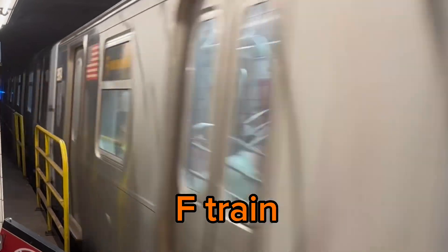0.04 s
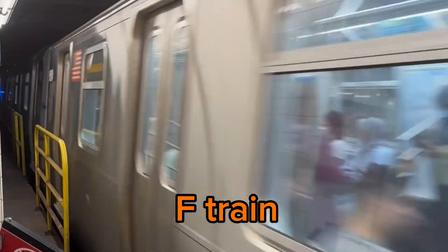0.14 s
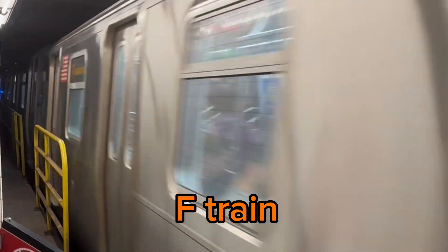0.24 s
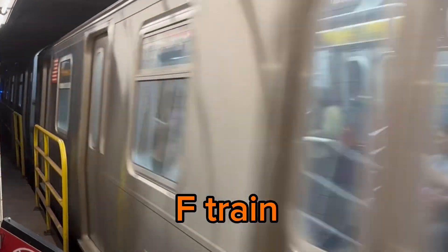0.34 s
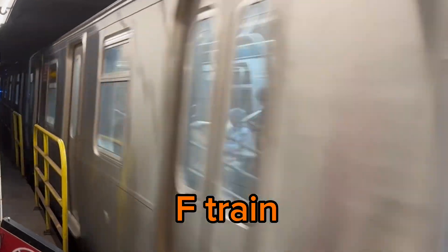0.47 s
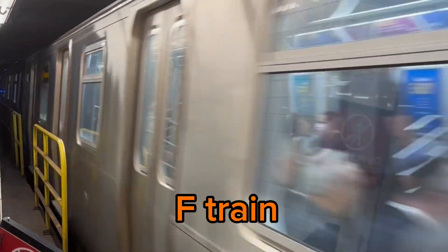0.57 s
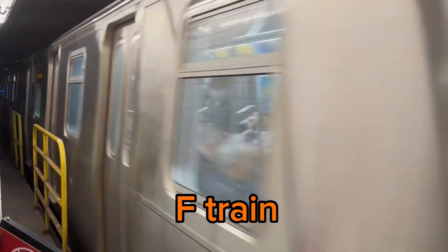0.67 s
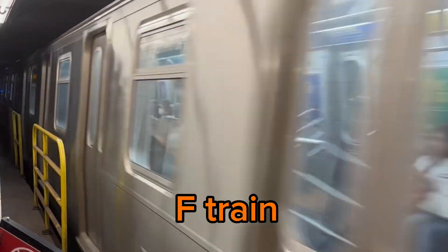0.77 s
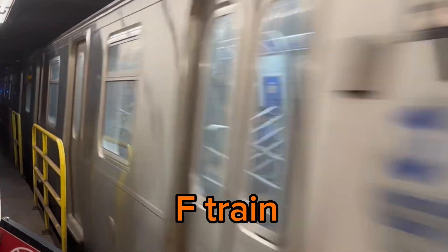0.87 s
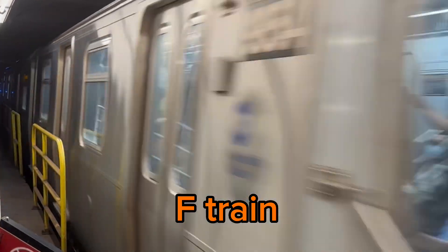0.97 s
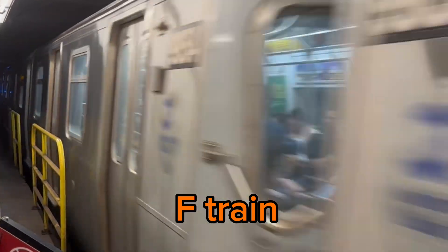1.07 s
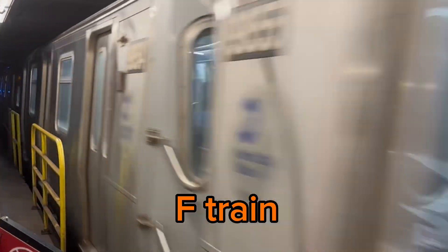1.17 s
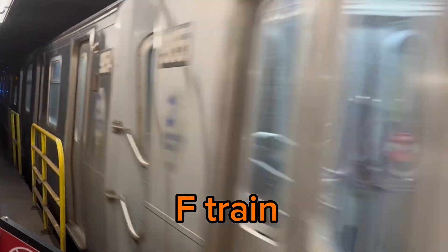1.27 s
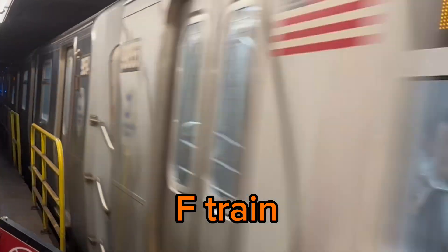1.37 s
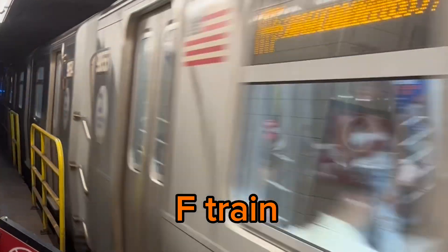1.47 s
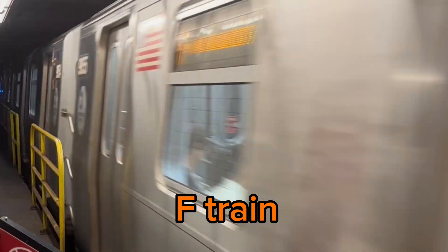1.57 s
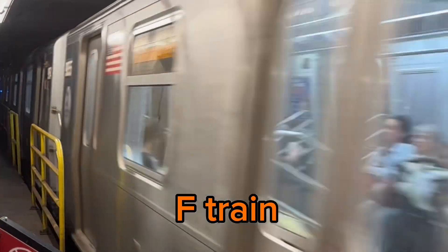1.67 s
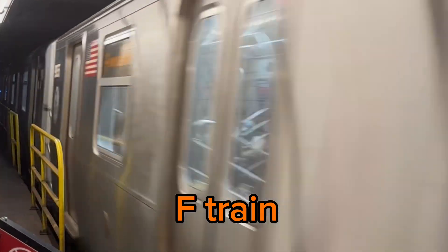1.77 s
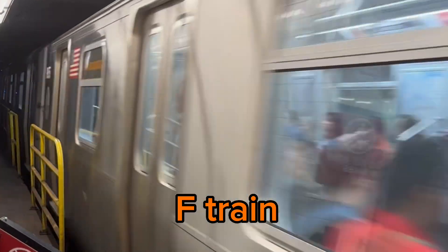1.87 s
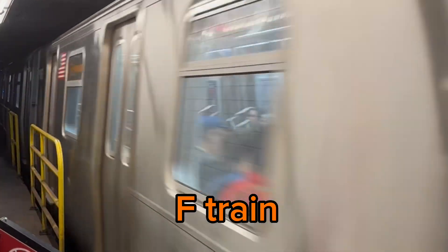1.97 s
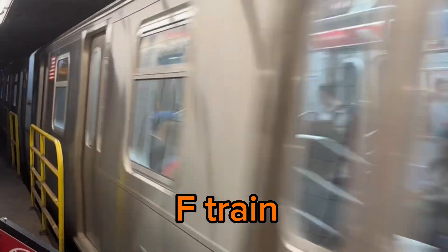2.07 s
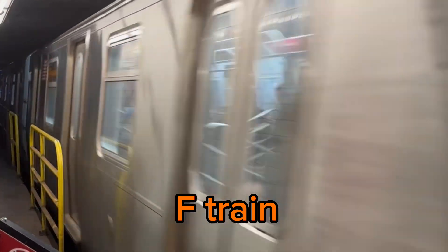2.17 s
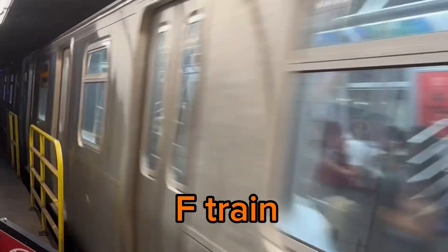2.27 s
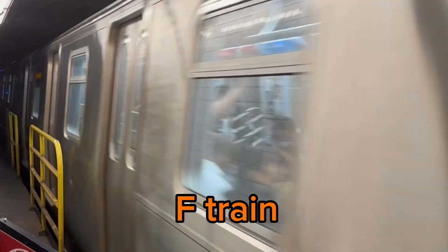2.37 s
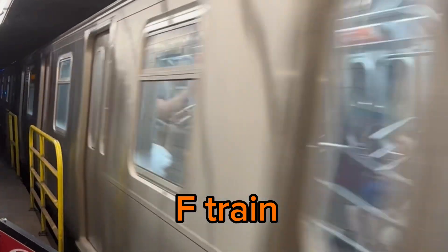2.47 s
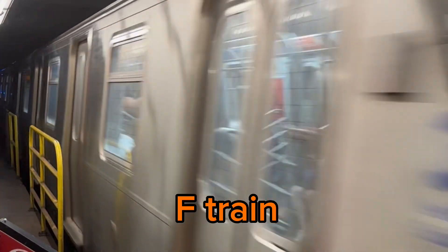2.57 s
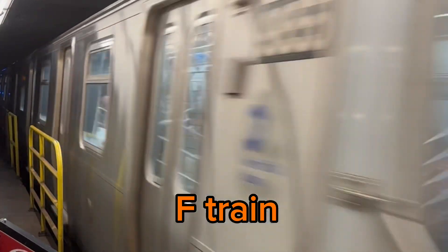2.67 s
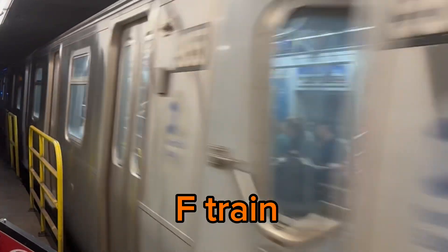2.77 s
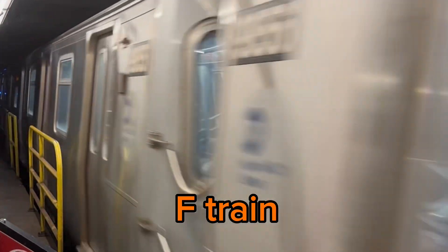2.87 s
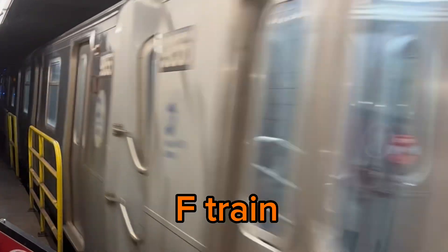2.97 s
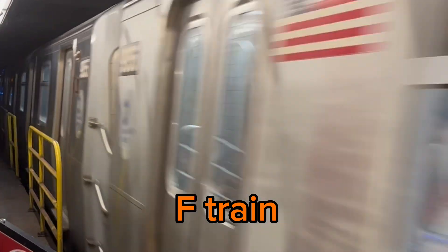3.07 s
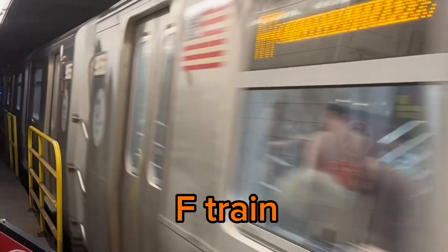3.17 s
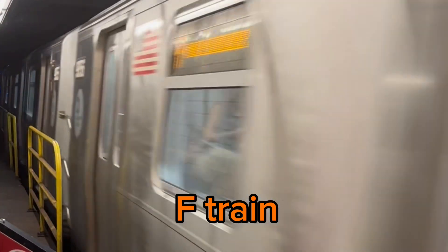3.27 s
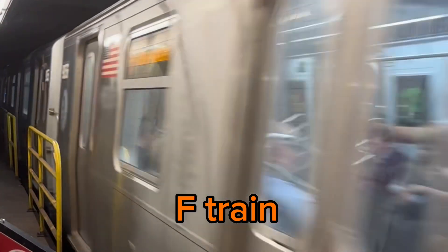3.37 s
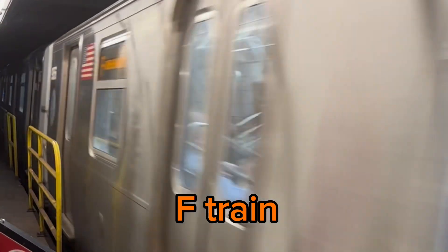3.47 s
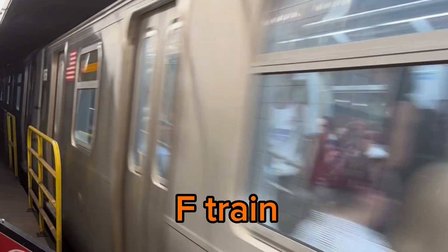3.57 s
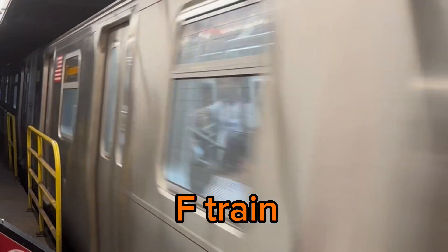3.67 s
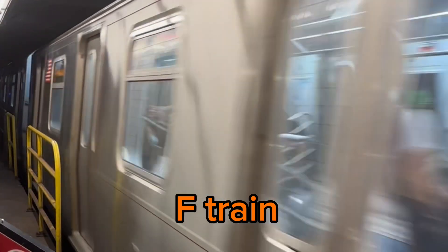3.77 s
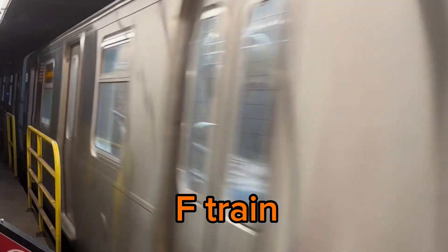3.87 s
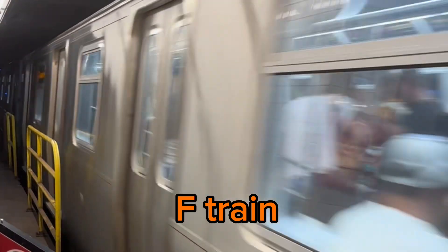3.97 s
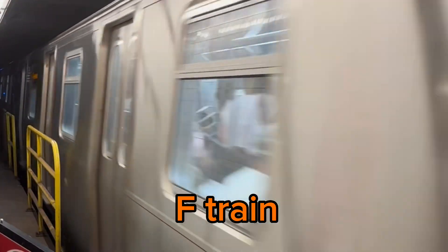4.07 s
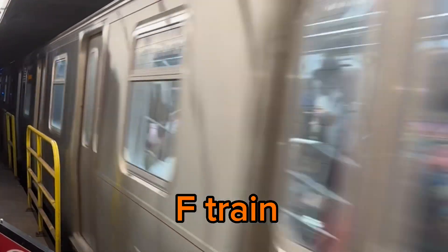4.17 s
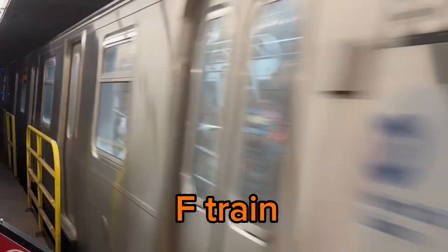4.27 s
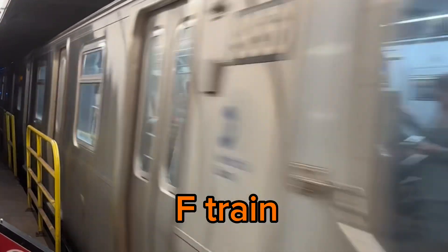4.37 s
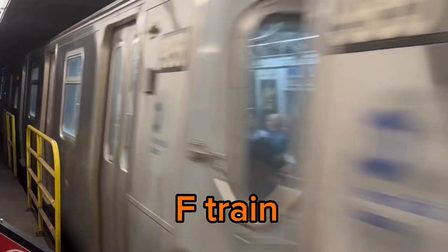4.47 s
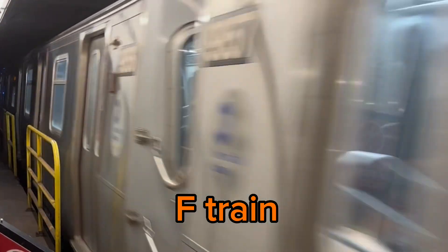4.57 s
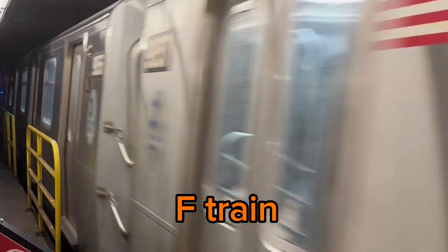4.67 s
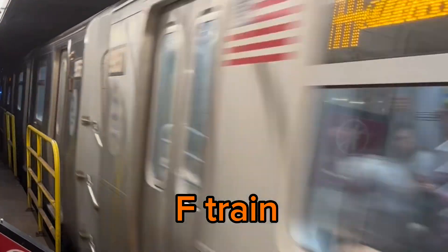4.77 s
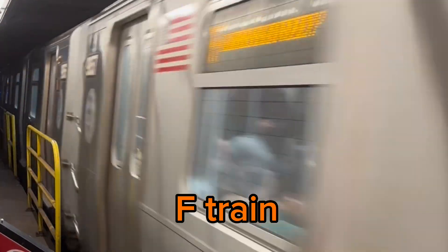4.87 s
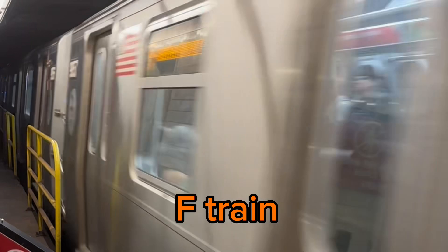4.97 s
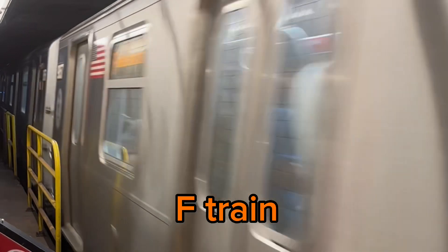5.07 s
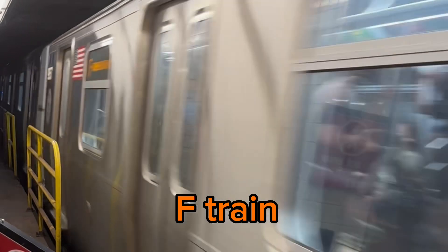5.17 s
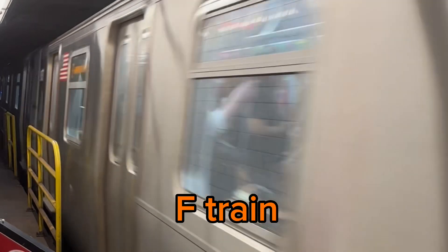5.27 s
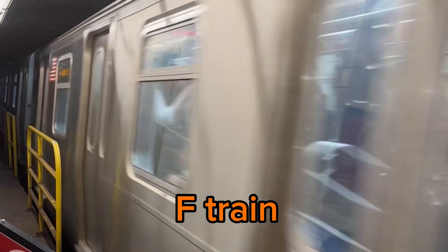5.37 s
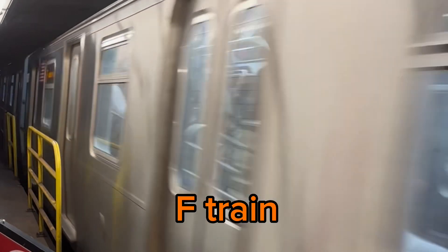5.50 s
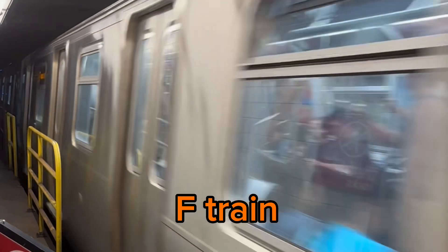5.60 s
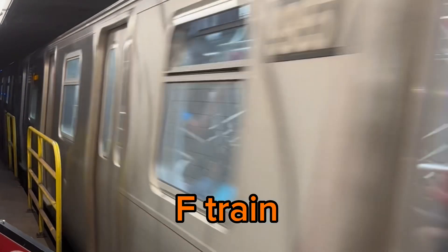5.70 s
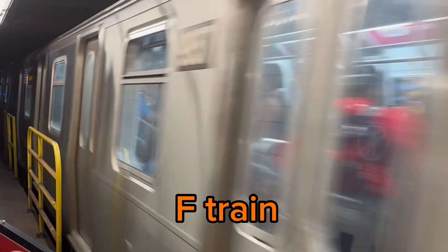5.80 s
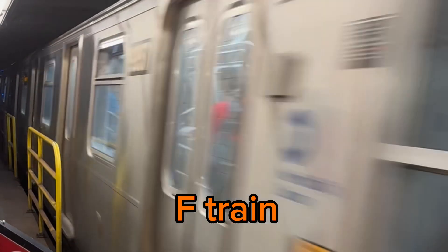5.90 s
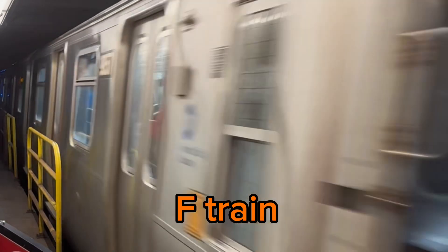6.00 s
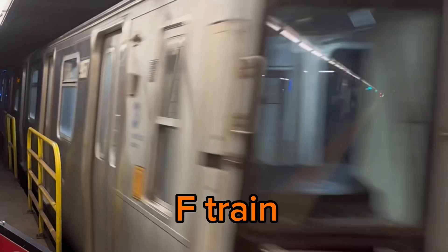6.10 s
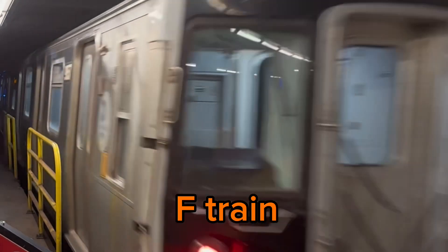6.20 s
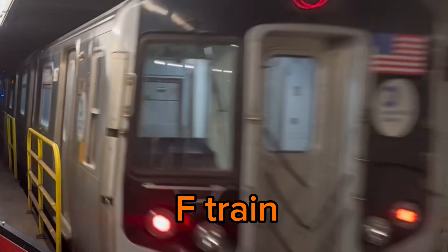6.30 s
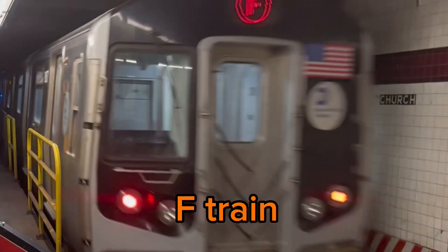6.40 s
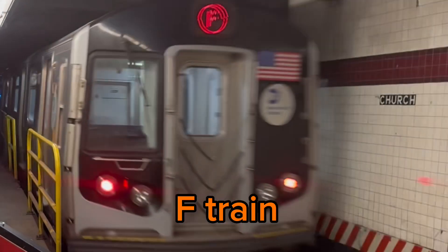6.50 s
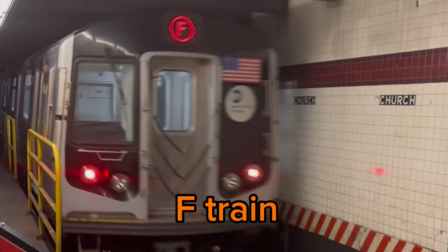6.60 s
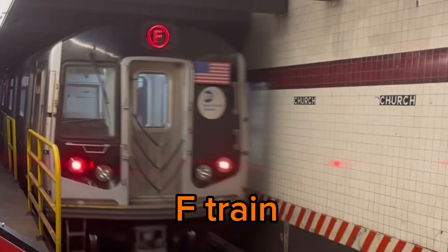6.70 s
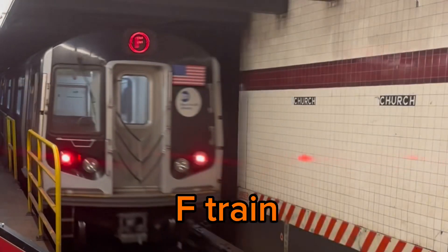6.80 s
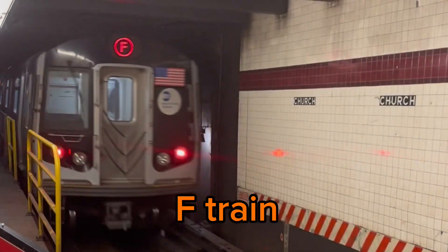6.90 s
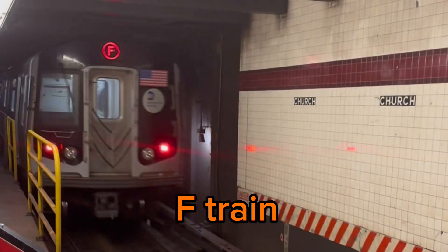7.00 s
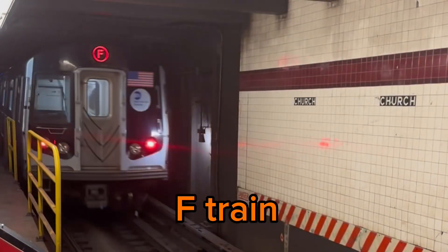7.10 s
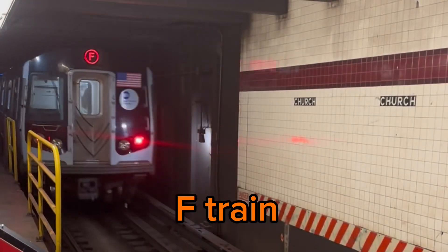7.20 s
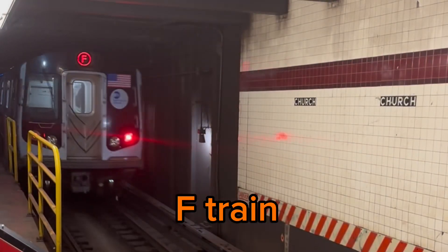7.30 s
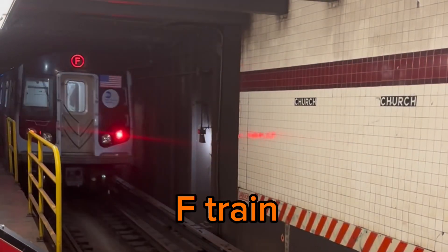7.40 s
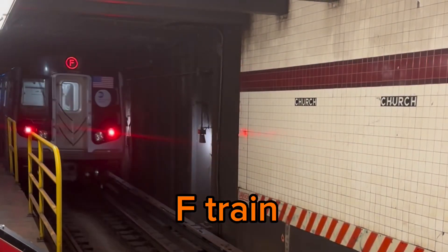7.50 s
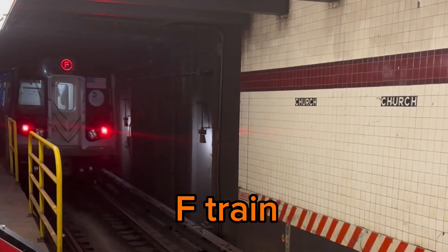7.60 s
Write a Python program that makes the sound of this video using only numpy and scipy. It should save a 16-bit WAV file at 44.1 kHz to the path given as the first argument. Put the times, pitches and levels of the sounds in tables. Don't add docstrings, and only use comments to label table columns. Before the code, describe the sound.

Close rumbling subway cars roll by with humming motors, singing rails and echoing joint clacks, fading as the last car leaves.

```python
import sys
import numpy as np
from scipy import signal
from scipy.fft import rfft, irfft, next_fast_len
from scipy.io import wavfile
from scipy.ndimage import uniform_filter1d

SR = 44100
rng = np.random.default_rng(int(sys.argv[2]) if len(sys.argv) > 2 else 0)


def how_loud(loudness_db):
    steps = np.asarray(loudness_db, float) / 20
    return 10 ** steps


def waveform_to_disk(signal):
    frames = np.transpose(np.atleast_2d(signal))
    scaled = np.clip(frames, -1, 1) * 32767
    samples = np.round(scaled).astype(np.int16)
    wavfile.write(sys.argv[1], SR, samples)


N = 337364
SIZE = next_fast_len(N + SR)
HZ = np.maximum(np.arange(SIZE // 2 + 1) * SR / SIZE, 1)
TIME = np.arange(N) / SR


def on_hz(table, hz=HZ, axis=1):
    table = np.array(table, float)
    return np.interp(np.log(hz), np.log(table[:, 0]), table[:, axis])


def on_time(table):
    s, *columns = np.transpose(table)
    return np.array([np.interp(TIME, s, c) for c in columns])


def shape(x, gain):
    return irfft(rfft(x, SIZE) * gain, SIZE)[..., :N]


def unit(x):
    return x / np.sqrt(np.mean(x ** 2))


def walk(rate):
    k = int(SR / rate)
    steps = np.repeat(rng.standard_normal(N // k + 1), k)
    return 1.296 * uniform_filter1d(uniform_filter1d(steps, k), k)[:N]


def bands(grid=HZ):
    for hz in 22 * 2 ** (np.arange(20) / 2):
        yield hz, np.cos(np.pi / 2 * np.clip(2 * np.log2(grid / hz), -1, 1))


def bell(hz, width):
    return 1 / (1 + (2 * (HZ - hz) / width) ** 2)


# (pitch [Hz], width [Hz], boost [dB])
STEEL = [(60.4, 5.7, 9.5), (331, 15.6, 3), (474, 173, 5.5), (698, 38, 3.5), (870, 74, -0.5), (1940, 205, 5),
         (2730, 210, -6.5), (4120, 820, 6), (6000, 720, 3.5)]


def steel():
    return how_loud(sum(db * bell(hz, width) for hz, width, db in STEEL))


# (time [s], nearness [dB], rail roughness [dB])
ROLL = [(0.0, 1.5, 1.5), (.34, -1.5, -2.5), (.59, -1.5, -2.5), (.79, -0.5, 1), (1.3, 1, -2), (1.83, 1, -1),
        (2.2, 0.5, 0), (2.98, 2, 1.5), (3.56, 1.5, -1), (3.85, 0, -0.5), (4.25, 1.5, 2.5), (4.71, 1.5, 2),
        (5.2, 0, 0.5), (5.45, -.5, -1), (5.94, -2.5, 5), (6.4, 3.5, -3), (6.88, -3, 1), (7.65, -4.5, -2)]
ZONE_HZ = (90, 500, 2600, 8000, 15000)
NEAR_SHARE = (0.53, 1.06, 0.68, 1.1, 1.1)
ROUGH_SHARE = (0.16, .05, 0.83, 1.1, 1.2)
# (frequency [Hz], level [dB per Hz])
BODY = [(25, -76), (40, -64.5), (60, -57), (150, -54), (340, -50.5), (560, -57), (900, -58.5), (1350, -66),
        (2600, -76), (3600, -80.5), (5200, -83.5), (8000, -84), (11000, -89), (15500, -95)]


def rolling(flicker_db=.8, shared_db=.3):
    colour = how_loud(on_hz(BODY)) * steel() * np.sqrt(SR / 2)
    rough = rfft(rng.standard_normal((2, SIZE))) * colour
    near_db, rough_db = on_time(ROLL)
    swell = np.outer(NEAR_SHARE, near_db) + np.outer(ROUGH_SHARE, rough_db)
    swell[0] += 0.1 * (TIME - TIME.mean())
    top_fade_start_s, top_fade_s, top_fade_db = 5.72, .1, -8
    swell[-1] += top_fade_db * np.clip((TIME - top_fade_start_s) / top_fade_s, 0, 1)
    out, shared = 0, walk(8.2)
    for hz, window in bands():
        place = np.interp(np.log(hz), np.log(ZONE_HZ), np.arange(5))
        db = np.maximum(1 - np.abs(place - np.arange(5)), 0) @ swell
        flicker = how_loud(db + shared_db * shared + flicker_db * walk(14))
        out = out + flicker * irfft(rough * window, SIZE)[:, :N]
    return out


# (time [s], centre [Hz], strength [dB])
SING = [(.35, 2650, 5), (.8, 3100, 4), (1.3, 2730, 2), (2.5, 2800, 3.5), (3.3, 2792, 1.5), (4.4, 2800, 4),
        (6.25, 2607, 1.5), (6.9, 3147, 2.5), (7.65, 2880, -1)]


def singing(width_hz=800):
    hz, strength_db = on_time(SING)
    near_db, rough_db = on_time(ROLL)
    db = -48 + strength_db + 0.94 * near_db + 0.26 * rough_db
    rub = unit(shape(rng.standard_normal((4, N)), bell(0, width_hz)))
    spin = np.exp(2j * np.pi * np.cumsum(hz) / SR)
    return how_loud(db) * np.real((rub[:2] + 1j * rub[2:]) * spin)


# (frequency [Hz], time to fall 60 dB [s])
HALL = [(100, 0.37), (500, 1), (1500, 1), (4000, 0.84), (12000, 0.46)]


def hall(rise_s, early=0.35, early_s=0.054, early_hz=1500):
    t = np.arange(SR) / SR
    noise = rfft(rng.standard_normal((2, SR)))
    tail = 0
    for hz, window in bands(np.maximum(np.arange(SR // 2 + 1), 1)):
        pit = 1 + early / (1 + (hz / early_hz) ** 4) * np.exp(-t / early_s)
        fall = how_loud(-60 * t / on_hz(HALL, hz))
        tail = tail + irfft(noise * window, SR) * fall * pit
    tail = tail * (1 - np.exp(-t / rise_s))
    return rfft(tail / np.sqrt(np.sum(tail ** 2) / 2), SIZE)


# (time [s], blow [dB], thud over blow [dB], crack over blow [dB])
JOINTS = [(0.0936, -20.5, 7, -16.5), (1.1892, -19.5, 2.5, -18), (1.3044, -36.5, 11.5, -15.5),
          (1.3849, -21.5, 4.5, -13.5), (1.6436, -18.5, 2, -14.5), (1.8257, -21, 9, -15.5),
          (2.6353, -25, 2, -20.5), (2.8967, -19, -0.5, -14.5), (3.0858, -19, 3.5, -16.5),
          (3.3105, -23.5, 4, -16.5), (3.344, -18.5, -1, -15), (3.5204, -17.5, 5, -15),
          (4.3394, -26.5, -10, -26.5), (4.5712, -20, 3, -13.5), (4.7617, -19.5, 3, -17),
          (5.0017, -19, 1.5, -15.5), (5.1877, -17.5, 4, -14.5), (6.1564, -20, 1, -30),
          (6.2174, -17.5, 0, -12.5), (6.4047, -14, 3.5, -12), (7.0317, -33.5, 10.5, -11),
          (7.2195, -25, 3, -21), (7.5495, -29.5, 3.5, -14)]
# (frequency [Hz], level [dB])
CLACK = [(900, -6), (1500, -1.5), (2800, -8.5), (4500, -16), (5300, -29), (8000, -26.5), (15500, -36)]
# (frequency [Hz], level [dB])
THUD = [(60, -20.5), (200, -8), (400, -3.5), (650, -5), (1050, -1), (1350, -17.5), (2500, -39)]
# (frequency [Hz], level [dB])
CRACK = [(3000, -12), (5300, 2.5), (6500, 1), (9500, -2), (15500, -16.5)]


def joints(thud_lead_s=0.00294, rattle_s=.012, patterns=5):
    blows = np.zeros((patterns, 3, N))
    leads_s = (0, thud_lead_s, 0)
    drags = (2.2, .8, 2.2)
    firsts = (.95, 3.2, .8)
    for k, (s, blow_db, thud_db, crack_db) in enumerate(JOINTS):
        layers_db = (blow_db, blow_db + thud_db, blow_db + crack_db)
        chance = rng.random((2, 30))
        late = 3 * chance[0] * (np.arange(30) > 0)
        push = 2 * chance[1] - 1
        clatter = push * np.abs(push) * np.exp(-late)
        for blow, db, lead_s, drag, first in zip(blows[k % patterns], layers_db, leads_s, drags, firsts):
            knock_s = s - lead_s + drag * rattle_s * late
            at = np.minimum((knock_s * SR).astype(int), N - 1)
            np.add.at(blow, at, how_loud(db) * unit(np.where(late > 0, clatter, first)))
    colours_db = np.array([on_hz(CLACK) + 22, on_hz(THUD) + 29, on_hz(CRACK) + 20])
    colours = how_loud(colours_db) * steel()
    direct, echo_rise_s = .2, .0015
    heard = 0
    for group in blows:
        bang = np.sum(rfft(group, SIZE) * colours, axis=0)
        heard = heard + bang * (direct + hall(echo_rise_s))
    return irfft(heard, SIZE)[:, :N]


HUM_HZ = (113.2, 232.9, 327.4)
HUM_FAR_DB, HUM_WAVER = (-43.5, -45, -43), (0.0162, 0.01202, 0.02214)
# (middle [s], length [s], level [dB])
DRIVES = [
    [(.2, 0.27, -35.5), (.62, 0.21, -34.5), (1.23, 0.14, -35), (1.45, .14, -29.5), (1.67, 0.088, -32),
     (2.0, 0.11, -31), (2.45, 0.7, -37.5), (3.1, 0.65, -33), (3.8, 0.49, -29), (4.45, 0.59, -26),
     (4.95, 0.25, -27), (5.75, .8, -37.5), (6.5, .12, -31.5)],
    [(.2, 0.27, -39.5), (1.2, 0.2, -45), (1.45, 0.074, -28), (2.15, 0.48, -35), (3.75, 0.77, -27.5),
     (4.35, 0.29, -33), (4.73, 0.21, -31), (5.38, 0.88, -31.5), (6.2, 1, -35.5), (7.22, 0.22, -34.5)],
    [(1.23, 0.15, -36), (1.65, 0.39, -32), (2.73, 0.35, -32.5), (3.36, 0.29, -29), (3.95, 0.54, -30),
     (4.65, .6, -31.5), (6.35, .25, -27.5), (7.1, 0.47, -41)],
]


def motors():
    out = 0
    for hz, far_db, waver, passes in zip(HUM_HZ, HUM_FAR_DB, HUM_WAVER, DRIVES):
        near = how_loud(far_db)
        for s, length_s, db in passes:
            near = near + how_loud(db) * np.exp(-(2 * (TIME - s) / length_s) ** 4)
        loudness = near * how_loud(2.4 * walk(13))
        pitch = hz * (1 + waver * walk(5))
        out = out + loudness * np.sin(2 * np.pi * np.cumsum(pitch) / SR)
    return np.sqrt(2) * out


# (time [s], pitch [Hz], level [dB], held [s])
SQUEALS = [
    (1.30, 6000, -48, .03),
    (1.348, 6000, -34, .002),
    (1.40, 6000, -47, .09),
    (3.0, 5950, -48, .02),
    (3.03, 5990, -36.5, .12),
]


def flanges(octave_db=-24, attack_s=.014, t60_s=0.42):
    slip = shape(rng.standard_normal((2, N)), bell(0, 260))
    flutter = how_loud(1.2 * walk(29.88))
    slip = (unit(slip[0]) + 1j * unit(slip[1])) * flutter
    wander = np.cumsum(20 * walk(15)) / SR
    out = 0
    for s, hz, db, held_s in SQUEALS:
        spin = np.exp(2j * np.pi * (hz * TIME + wander))
        rise = np.clip((TIME - s) / attack_s, 0, 1)
        fall_db = -60 * np.maximum(TIME - s - attack_s - held_s, 0) / t60_s
        out = out + rise * how_loud(db + fall_db) * np.real(slip * (spin + how_loud(octave_db) * spin ** 2))
    return out


# (time [s], level [dB], time to fall 60 dB [s])
PUFFS = [
    (.56, -28, 1),
]


def valve(rise_s=0.058):
    hiss_db = on_hz([(2500, -6.5), (6000, -6), (9000, -3), (16000, -4)])
    jet = unit(shape(rng.standard_normal((2, N)), how_loud(hiss_db)))
    pressure = 0
    for s, db, t60_s in PUFFS:
        age = np.maximum(TIME - s, 0)
        pressure = pressure + how_loud(db - 60 * age / t60_s) * (1 - np.exp(-age / rise_s))
    return jet * pressure


def scene():
    tones = motors() + flanges()
    both_tones = np.array([tones, np.roll(tones, SR // 90)])
    return rolling() + singing() + joints() + both_tones + valve()


def top_cut(x):
    return signal.sosfilt(signal.butter(12, 17070, fs=SR, output="sos"), x)


# (frequency
# [Hz], sum [dB], difference [dB], in-phase share [0-1], quarter-turn share [signed ratio])
SIDES = [(40, 7.5, -44, 0.065, 0), (120, -0.5, -41, .1, -1.75), (300, -1, -20, .5, 0.54),
         (586, -2, -9.5, 0.38, 0.1), (805, 0, -4, 0.12, -0.31), (1140, -2, -9, 0, .45),
         (1900, -1, -21, .1, .1), (2880, 1, -0.5, 0.032, .2), (4100, -4, -11.5, 0, .2),
         (6000, -1.5, -6.5, 0.028, -.75), (8220, -1.5, -1.5, 0.000054, -.75), (10240, -10, -3, 0.13, -.4),
         (10700, -24.5, -3.5, 0.13, 0), (13240, -14.5, -5, 0, 0), (15500, -6, -3.5, 0.084, .3)]


def record(dry):
    total_db, apart_db, in_phase, quadrature = (on_hz(SIDES, axis=k) for k in range(1, 5))
    apart_db = np.maximum(apart_db, -22)
    tied = in_phase + 1j * quadrature
    free = np.sqrt(np.clip(1 - np.abs(tied) ** 2, 0, 1))
    mid = shape(dry[0], how_loud(total_db))
    side = shape(dry[0], how_loud(apart_db) * tied) + shape(dry[1], how_loud(apart_db) * free)
    ceiling, top_hz = 1.1, 15760
    rounded = ceiling * np.tanh(np.array([mid + side, mid - side]) / ceiling)
    mix = shape(rounded, HZ < top_hz)
    return top_cut(mix)


dry = scene()
out = record(dry)
waveform_to_disk(out)
```